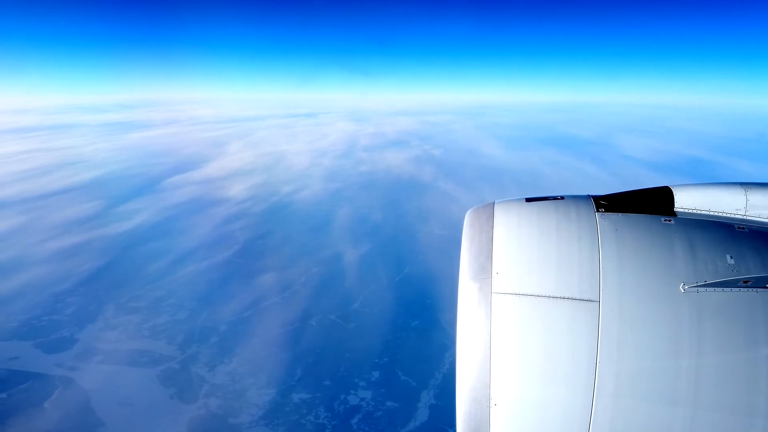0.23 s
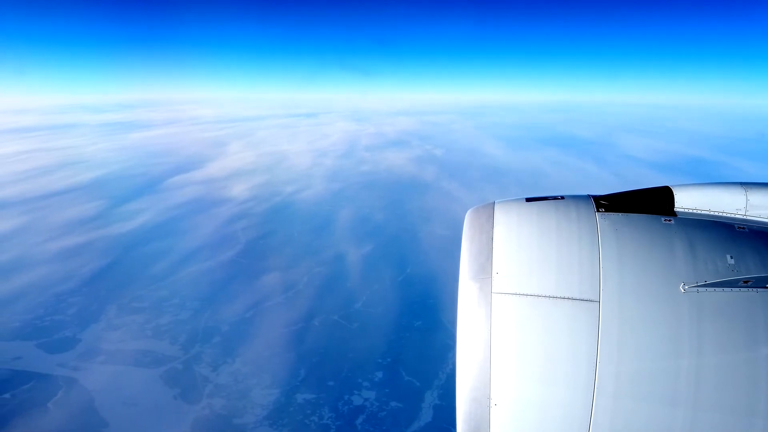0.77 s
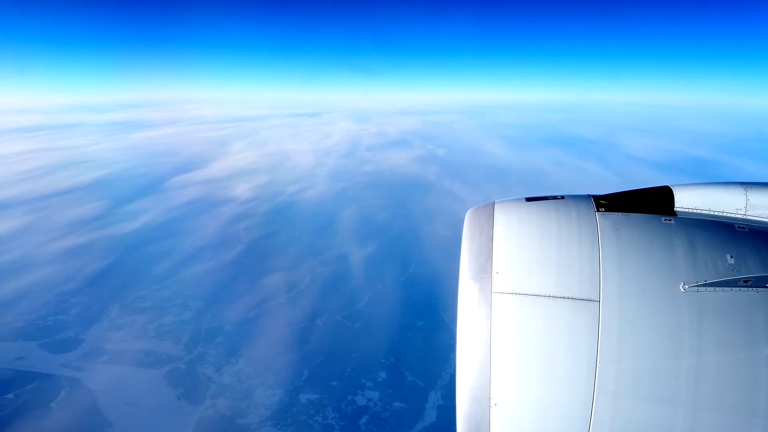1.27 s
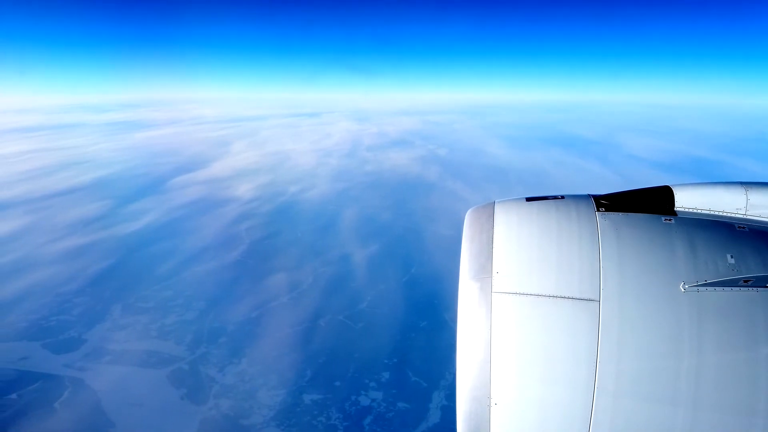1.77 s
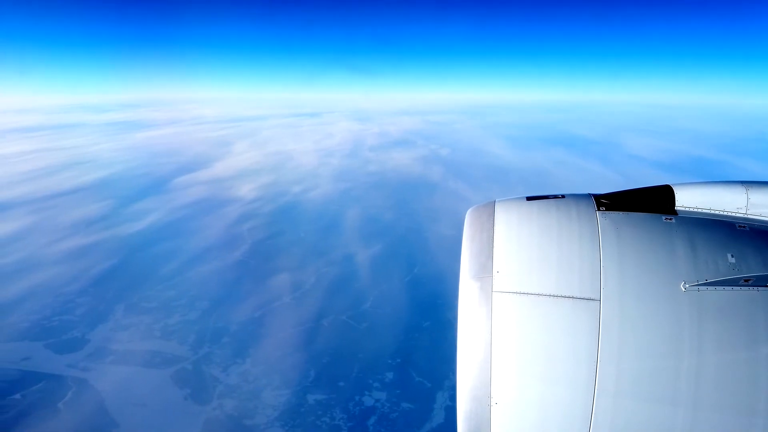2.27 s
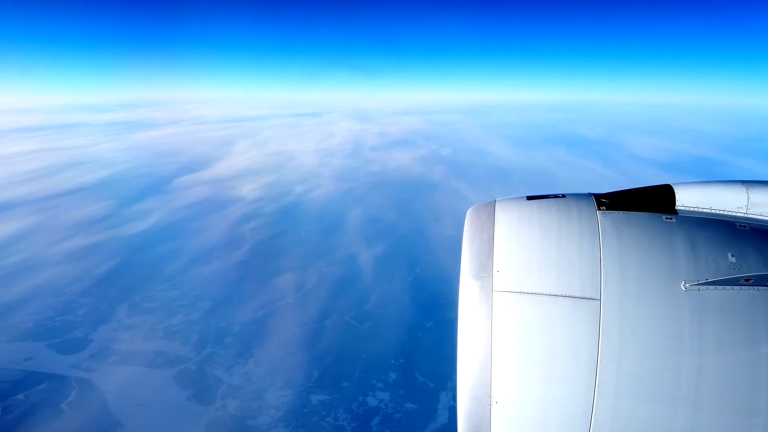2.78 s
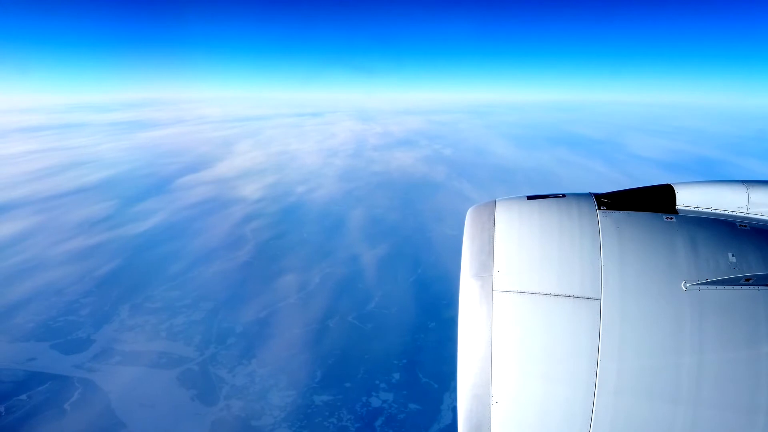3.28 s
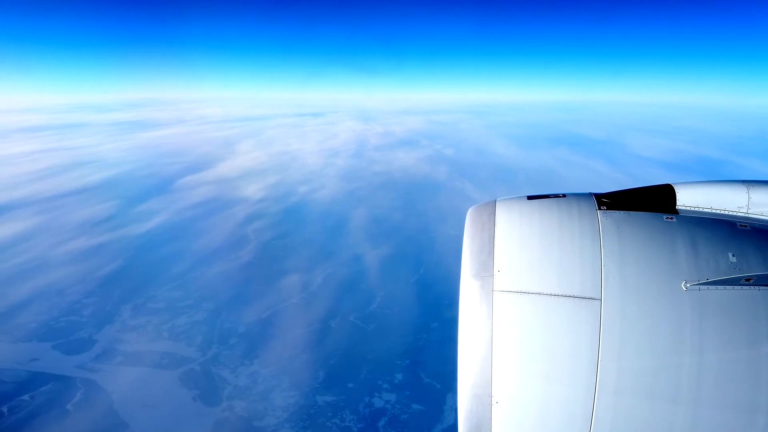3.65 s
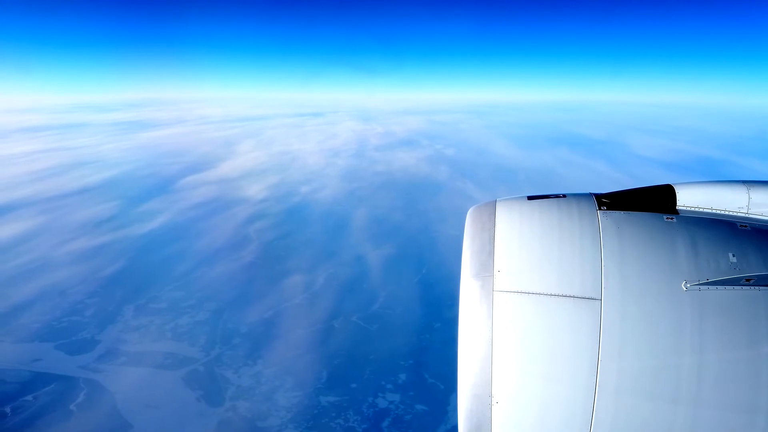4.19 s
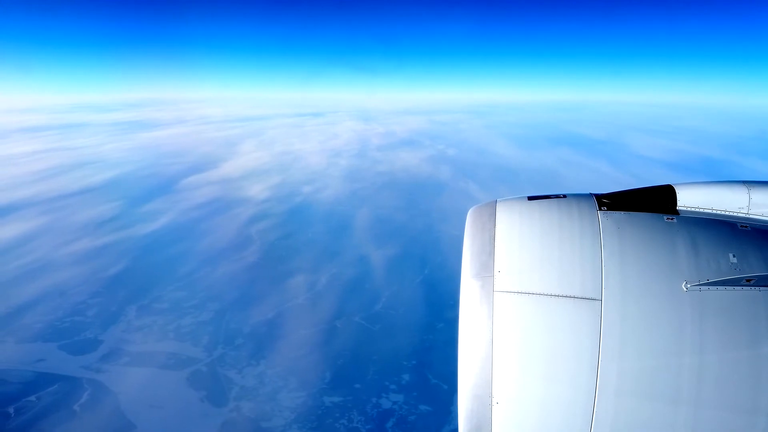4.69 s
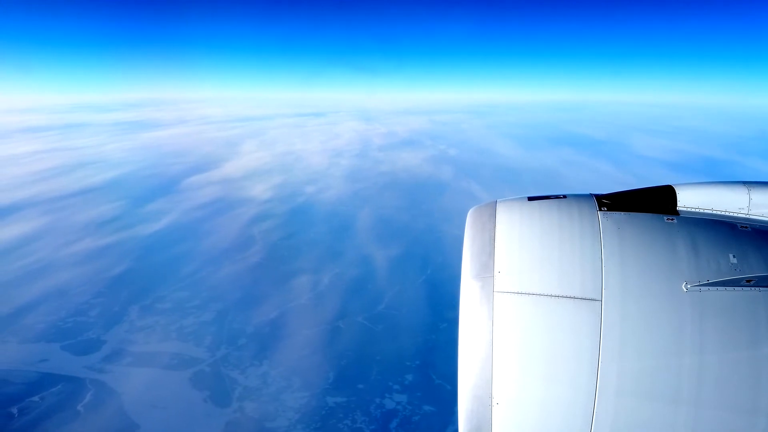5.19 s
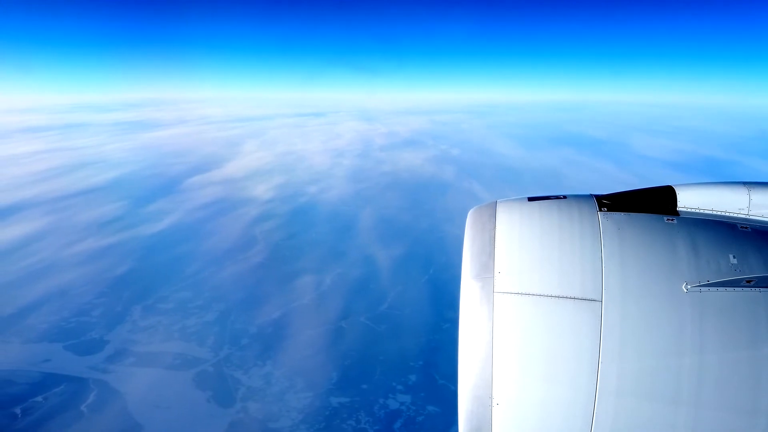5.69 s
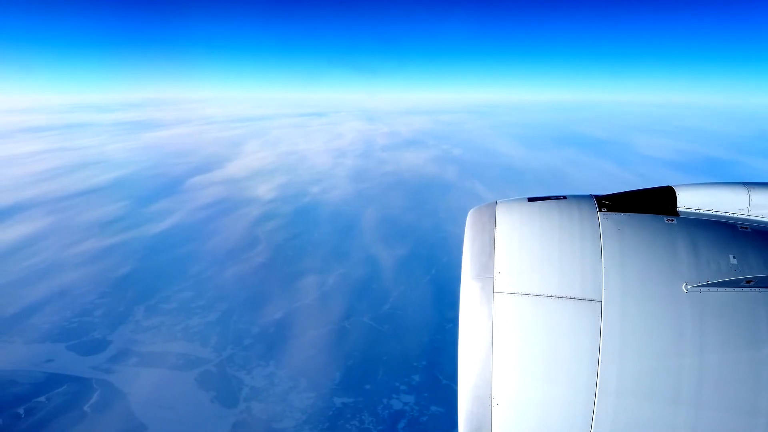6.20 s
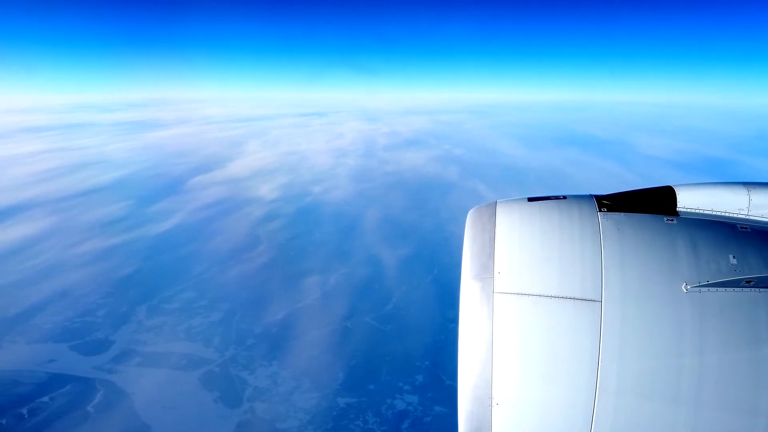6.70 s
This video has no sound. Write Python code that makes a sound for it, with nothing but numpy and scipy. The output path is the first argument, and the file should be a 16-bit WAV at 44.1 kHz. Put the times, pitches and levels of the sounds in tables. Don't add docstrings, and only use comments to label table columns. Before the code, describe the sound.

Inside a cruising airliner, low engine and airflow rumble surges unevenly under intermittent crisp plastic rustling and two faint, quick metal tinks.

```python
import sys
import numpy as np
from scipy import signal
from scipy.fft import rfft, irfft, next_fast_len
from scipy.io import wavfile
from scipy.ndimage import uniform_filter1d

SR = 44100
rng = np.random.default_rng(int(sys.argv[2]) if len(sys.argv) > 2 else 0)


def magnitude_from_level(level_db):
    exponent = np.asarray(level_db, float) / 20
    return 10 ** exponent


def master_out(mix):
    frames = np.transpose(np.atleast_2d(mix))
    ceiling = np.clip(frames, -1, 1)
    pcm = np.round(ceiling * 32767).astype(np.int16)
    wavfile.write(sys.argv[1], SR, pcm)


N = 306054


def evened(x):
    return x / np.sqrt(np.mean(x ** 2) + 1e-20)


def read(points, hz):
    f, value = np.transpose(points)
    return np.interp(np.log(hz + 1), np.log(f + 1), value)


def coloured(x, gain):
    size = next_fast_len(len(x))
    hz = np.fft.rfftfreq(size, 1 / SR)
    return irfft(rfft(x, size) * gain(hz), size)[:len(x)]


def resonance(f, hz, width, order=2):
    return 1 / (1 + (2 * (f - hz) / width) ** order)


def crackle(crease_db, ticks_per_s=5000, creases_per_s=1200, crease_ms=12, spread_db=-0.5):
    def draw(shape, chance):
        strength = magnitude_from_level(spread_db * np.minimum(rng.exponential(1, shape), 5))
        return strength * (rng.random(shape) < chance)

    ticks = draw(N, ticks_per_s / SR) * rng.choice([-1., 1.], N)
    frames, hop, size = N // 64 + 5, 64, 256
    bins = size // 2
    starts = draw((frames, bins + 1), creases_per_s * hop / SR / bins).T
    dying = signal.lfilter([1], [1, -np.exp(-1000 * hop / SR / crease_ms)], starts)
    turning = np.exp(2j * np.pi * hop / size * np.outer(np.arange(bins + 1), np.arange(frames)))
    creases = signal.istft(dying * turning, nperseg=size, noverlap=size - hop)[1][:N]
    return evened(ticks) + magnitude_from_level(crease_db) * evened(creases)


def gestures(rows, firm_body_db, fade_ms=6.8, lighter=1.3):
    firm_db = -40.5
    ms = np.arange(N) * 1000 / SR
    power = np.zeros((3, N))
    for s, db, fizz_db, rise, hold in rows:
        since = ms - 1000 * s
        attack = np.clip(since / max(rise, .3), 0, 1)
        decay = np.exp(-np.clip(since - rise - hold, 0, None) / fade_ms)
        body_db = firm_body_db + lighter * (db - firm_db)
        band_db = db + np.array([[body_db], [0], [fizz_db]])
        power += magnitude_from_level(2 * band_db) * (attack * decay) ** 2
    return power


# frequency in Hz, width in Hz, lift in dB.
RESONANT_LIFTS = [(3500, 600, 5), (4880, 350, 5), (7750, 400, 4), (9100, 400, 2), (10700, 700, 3),
                  (13100, 500, 2)]


def film(power, spectrum, ticks):
    def colour(f):
        lift = sum(db * resonance(f, hz, width) for hz, width, db in RESONANT_LIFTS)
        return magnitude_from_level(read(spectrum, f) + lift)

    def below(f, hz):
        return 1 / (1 + (f / hz) ** 12)

    shares = [lambda f: below(f, 2600) * (f > 1000),
              lambda f: below(f, 5400) - below(f, 2600),
              lambda f: 1 - below(f, 5400)]
    bands = [evened(coloured(ticks, lambda f: colour(f) * share(f))) for share in shares]
    return sum(np.sqrt(p) * band for p, band in zip(power, bands))


def uneven(x, patchy_db):
    z = signal.stft(x, nperseg=256)[2]
    patches = rng.standard_normal(z.shape[::-1]).T
    patches = uniform_filter1d(patches, size=6, axis=0)
    patches = evened(uniform_filter1d(patches, size=8, axis=1))
    varied = signal.istft(z * magnitude_from_level(patchy_db * patches), nperseg=256)[1][:N]
    return magnitude_from_level(-.12 * patchy_db ** 2) * varied


# start in seconds, level in dB, fizz in dB over the middle band, rise in ms, hold in ms.
SNAPS = [
    (1.9155, -36, 0, 0.24, 4.4),
    (2.490, -54, 6, 3.7, 4.6),
    (2.858, -44, 2, 7.6, 9.8),
    (2.886, -45, 3, 4.7, 12),
]
# start in seconds, level in dB, fizz in dB, rise in ms, hold in ms.
STROKES = [
    (2.598, -42, -5, 22, 40),
    (2.675, -51.5, -6, 9.1, 32),
    (3.625, -49.5, -8.5, 19, 16),
    (3.981, -47, -8.5, 12, 32),
    (4.062, -48.5, -13, 6, 29),
    (5.818, -41.5, -9, 22, 36),
    (3.3, -53, -9.5, 7.4, 30),
    (6.592, -51, 3, 10, 16),
    (6.04, -58, -1.5, 18, 24),
]
# start in seconds, level in dB, fizz in dB, rise in ms, hold in ms.
CRUMPLES = [(.098, -55, -4.5, 20, 65), (.17, -47, -8.5, 46, 15), (1.86, -63, -3, 25, 30),
            (2.43, -65, 0, 30, 30), (3.13, -50.5, -5.5, 29, 40), (3.21, -53.5, -12, 30, 80),
            (4.34, -66, -4.5, 30, 14), (4.41, -62.5, -3.5, 25, 11), (4.975, -65, -7, 15, 11),
            (5.08, -60, -9, 5.4, 73), (5.13, -54, -11, 86, 15), (5.785, -52, -8, 34, 5),
            (2.79, -64.5, -4, 20, 40), (2.838, -55, 0, 20, 5), (2.57, -61, -3, 25, 8),
            (2.70, -59, -4, 15, 45), (5.88, -54, -8, 20, 45), (6.025, -64, -2, 25, 10),
            (6.66, -60, -2, 20, 50), (1.96, -57, -4, 10, 35), (6.09, -63, -8, 5, 100),
            (6.24, -56.5, -6, 37, 18), (6.34, -60.5, -3.5, 12, 320), (6.53, -49, -2, 90, 12)]
# frequency in Hz, density in dB per Hz.
SNAP_FILM = [(1300, 2), (2300, -4.5), (4000, -7), (5300, -6), (5900, -9), (9000, -10), (10500, -8),
             (12000, -13.5), (13400, -11.5), (14300, -14), (15300, -13), (15800, -24.5)]
# frequency in Hz, density in dB per Hz.
FILM = [(1300, -8), (2300, -11.5), (3000, -4.5), (4300, -4), (5100, -9), (5500, -10), (7000, -14),
        (11000, -14.5), (11600, -21), (13600, -21.5), (15000, -29), (15800, -42)]


def wrapper():
    snap_power = gestures(SNAPS, firm_body_db=-1.5, lighter=0)
    snaps = film(snap_power, SNAP_FILM, crackle(crease_db=-20))
    worked = gestures(STROKES, firm_body_db=0.5) + gestures(CRUMPLES, firm_body_db=3.0, fade_ms=34)
    rustle = film(worked, FILM, crackle(crease_db=-5.5))
    return magnitude_from_level(-6.5) * snaps + uneven(magnitude_from_level(-7.0) * rustle, patchy_db=1.8)


def rubbed(rows, width_hz, taper, order, wider=0):
    out = np.zeros(N)
    rubs = rng.standard_normal((len(rows), 6000))
    for (s, hz, db, ms), rub in zip(rows, rubs):
        width = width_hz + wider * hz
        ring = evened(coloured(rub, lambda f: resonance(f, hz, width, order)))
        size, start = min(round(ms * SR / 1000), len(rub)), round(s * SR)
        out[start:start + size] += magnitude_from_level(db) * ring[:size] * signal.windows.tukey(size, taper)
    return out


# start in seconds, frequency in Hz, level in dB, length in ms.
POCKETS = [(0.19, 3750, -60, 54), (6.545, 5050, -66, 50), (6.545, 3500, -63, 45), (2.465, 2040, -50, 32),
           (2.49, 4800, -56, 19), (2.606, 3520, -47.5, 54), (2.6, 4950, -53, 50), (6.605, 7800, -62, 20),
           (2.86, 3270, -53, 30), (2.863, 4300, -53, 24), (2.887, 3480, -52, 24), (3.16, 3800, -64, 93),
           (3.19, 6000, -69, 23), (3.295, 6300, -66, 49), (3.302, 9000, -69, 25), (3.99, 3500, -61, 41),
           (5.145, 6060, -68, 50), (5.211, 4220, -60, 26), (5.215, 6170, -68, 25), (5.825, 3300, -55, 42),
           (6.05, 5200, -65, 25), (6.06, 6700, -68, 50), (6.29, 8000, -73.5, 60), (6.5, 8700, -72, 55),
           (6.52, 10300, -69, 90), (6.599, 5130, -61, 77), (6.601, 3560, -60, 60)]
# start in seconds, frequency in Hz, level in dB, length in ms.
FOLDS = [(0.11, 12500, -74, 85), (0.17, 6600, -69, 110), (0.19, 3700, -59, 66), (1.9150, 2700, -44.5, 20),
         (1.9155, 3800, -45, 16), (1.9155, 4730, -44, 26), (1.915, 12000, -46, 13), (2.6, 3300, -52, 30),
         (2.607, 4950, -58, 70), (2.66, 12800, -71, 55), (3.13, 6800, -70, 30), (3.13, 12500, -73, 30),
         (3.982, 4700, -59, 22), (5.15, 4600, -66, 110), (5.82, 1900, -47.5, 63), (5.82, 3000, -47, 22),
         (5.83, 8500, -62, 50), (5.835, 12000, -68, 60), (5.88, 9500, -71, 80), (6.045, 9800, -68, 40),
         (6.045, 6300, -67, 25), (6.045, 13500, -77, 30), (6.5, 5000, -68, 50), (5.82, 5500, -57, 60),
         (2.857, 2900, -54, 50), (3.99, 8500, -70, 78), (6.6, 5900, -61.5, 40), (5.87, 13500, -77.5, 70)]
# start in seconds, frequency
# in Hz, level in dB, length in ms.
SPECKS = [(0.113, 9700, -67, 35), (0.12, 7700, -68.5, 30), (0.19, 3700, -56, 12), (0.2, 5500, -62, 40),
          (0.218, 3500, -58, 8), (0.25, 7900, -70, 35), (0.26, 3310, -60, 30), (1.917, 2680, -45, 5.5),
          (1.92, 4200, -40, 6), (1.929, 4200, -44, 7.4), (1.924, 15000, -56, 12), (1.943, 4500, -48, 14),
          (1.965, 4400, -59, 35), (2.613, 10800, -59, 35), (2.626, 4900, -50, 14), (2.66, 3600, -47, 16),
          (2.66, 4900, -53, 14), (2.655, 10300, -60, 20), (2.685, 12800, -63, 12), (2.845, 10700, -64, 18),
          (2.859, 3300, -47, 8), (2.864, 12900, -54, 14), (2.864, 4500, -49, 9), (2.887, 15200, -56, 15),
          (2.892, 3600, -48, 7), (2.9, 3400, -49, 4.2), (2.905, 12900, -59, 25), (2.9, 10700, -62, 45),
          (5.8, 9500, -74, 28), (5.815, 5500, -60, 14), (5.838, 3600, -45, 16), (5.845, 1800, -44, 16),
          (5.86, 3500, -48, 10), (5.87, 4100, -57, 30), (5.875, 2600, -54, 44), (5.89, 6900, -66, 25),
          (5.9, 10200, -71, 60), (6.05, 5100, -68, 100), (6.5, 5000, -64, 20), (6.545, 5100, -63, 27),
          (6.545, 3500, -56, 10), (6.595, 10100, -59, 30), (6.605, 3700, -54, 18), (6.645, 5200, -63, 35),
          (6.68, 3600, -55, 10), (6.635, 10300, -65, 50), (3.995, 3720, -53, 12), (3.64, 4000, -56, 14),
          (4.03, 5000, -63, 30), (3.26, 8600, -70, 12),
          (1.93, 5100, -50, 30), (2.78, 7200, -75, 45), (2.8, 10800, -74, 35), (3.27, 6700, -69, 20),
                (3.985, 12600, -69, 15), (4.06, 9600, -68, 30), (4.065, 4600, -59, 19),
                (4.068, 6200, -64.5, 20), (5.83, 2500, -51, 41), (5.82, 5200, -55, 60),
                (5.88, 1900, -52, 50), (6.05, 6900, -66, 60), (3.16, 4900, -64, 40), (3.34, 3500, -62, 35)]


def pockets_and_folds():
    pockets = rubbed(POCKETS, width_hz=440, taper=.6, order=2)
    folds = rubbed(FOLDS, width_hz=600, taper=.3, order=4, wider=.2)
    creases = rubbed(SPECKS, width_hz=350, taper=.7, order=2, wider=.03)
    return pockets + folds + creases


# start in seconds, peak in dB.
TINKS = [
    (2.4673, -60),
    (2.8634, -46),
    (2.8690, -37),
    (2.8903, -37),
    (2.9507, -62),
    (3.3443, -64),
]
# frequency in Hz, level in dB, 60 dB decay time in seconds.
METAL_MODES = [(7750, 0, .06), (7850, -9, .04)]


def tinks():
    t = np.arange(8000) / SR
    touches = np.zeros(N)
    s, db = np.transpose(TINKS)
    touches[np.round(s * SR).astype(int)] = magnitude_from_level(db)
    ring = sum(magnitude_from_level(d - 60 * t / t60) * np.sin(2 * np.pi * hz * t) for hz, d, t60 in METAL_MODES)
    onset = np.minimum(t / .002, 1)
    return signal.oaconvolve(touches, magnitude_from_level(-1.0) * ring * onset)[:N]


def mode(hz, width):
    return evened(coloured(rng.standard_normal(N), lambda f: resonance(f, hz, width)))


# frequency in Hz, width in Hz, drone in dB, length of a surge in seconds.
DRONES = [
    (98.7, 26, -36.5, 0.056),
    (147, 30.5, -28.5, 0.07),
    (226.5, 27.3, -31.5, 0.061),
    (380, 93, -43, 0.048),
    (480.5, 16, -43.5, 0.069),
]
# time in seconds, level in dB.
RUMBLE = [(0.16, -24.1), (0.58, -23.5), (2.04, -29), (2.66, -30), (2.95, -27.5), (3.41, -22.5), (4.62, -24),
          (4.74, -28.3), (4.87, -27), (6.01, -30), (6.57, -34), (6.88, -28.5)]
# time in seconds, level in dB.
LOW_BOOM = [(0.34, -22.5), (0.553, -21), (0.613, -14.8), (0.711, -23.5), (0.81, -24), (1.41, -27),
            (1.78, -25), (1.89, -27.5), (2.44, -22.5), (3.1, -24), (3.32, -27), (3.47, -26), (3.85, -24.5),
            (4.18, -23.8), (4.49, -18.5), (4.68, -22), (5.02, -26), (5.14, -19), (5.9, -21), (6.02, -16.5),
            (6.25, -21.5), (6.55, -22.5), (6.89, -22.5)]
# time in seconds, level in dB.
HIGH_BOOM = [(0.15, -23.5), (0.24, -25.5), (0.64, -21.5), (0.82, -30), (0.92, -25.5), (1.3, -25),
             (2.44, -23.5), (2.88, -25), (3.16, -23), (3.37, -26), (3.54, -28.5), (4.58, -26),
             (4.97, -25.5), (5.56, -26.5), (5.66, -23.5), (5.8, -28), (6.2, -23.5), (6.35, -26.5),
             (6.53, -29), (6.83, -26.5)]
# time in seconds, level in dB.
LOW_HUM = [(0.06, -39.5), (0.42, -33), (2.71, -46), (4.15, -32.5), (4.49, -33), (4.67, -28), (4.8, -30.5),
           (5.39, -35), (5.79, -35.5), (6.31, -32.5)]
# time in seconds, level in dB.
HIGH_HUM = [(0.09, -43), (0.32, -46), (0.99, -39.5), (1.64, -37), (2.24, -35.5), (2.81, -41), (3.09, -31.5),
            (3.29, -38.5), (3.71, -35), (3.84, -33), (4.2, -32.5), (4.44, -35), (5.17, -30.5),
            (5.42, -36.5), (5.69, -35), (6.14, -35), (6.25, -31.5), (6.43, -35)]
# time in seconds, depth in dB.
LOW_CALM = [(0.93, 9), (1.13, 8), (2.83, 13), (3.21, 7), (3.62, 5), (3.95, 3.5), (4.28, 11), (5.41, 10)]
# time in seconds, depth in dB.
HIGH_CALM = [(0.4, 8.1), (1.57, 4), (1.96, 9.9), (2.72, 5.8), (3.27, 3.7), (3.67, 3.4), (3.98, 3.3),
             (4.45, 7.6), (6.0, 12)]
# time in seconds, depth in dB.
HUM_CALM = [(0.54, 4.6), (0.85, 7.1), (1.25, 4.1), (2.03, 6.9), (2.49, 3.4), (3.95, 2.7), (5.0, 6.6),
            (5.86, 6.5)]


def booms():
    t = np.arange(0, N + 64, 64) / SR
    out = np.zeros(N)

    def bells(s, length):
        return np.exp(-(2 * (t[:, None] - s) / length) ** 2)

    weather = [(RUMBLE, LOW_CALM), (LOW_BOOM, LOW_CALM), (HIGH_BOOM, HIGH_CALM),
               (LOW_HUM, HUM_CALM), (HIGH_HUM, HUM_CALM)]
    for (hz, width, drone_db, surge_s), (buffets, calms) in zip(DRONES, weather):
        ring = mode(hz, width)
        slow = uniform_filter1d(uniform_filter1d(ring ** 2, size=1800), size=1800)
        s, db = np.transpose(buffets)
        calm_s, depth_db = np.transpose(calms)
        drone = magnitude_from_level(2 * (drone_db - bells(calm_s, .14) @ depth_db))
        length = surge_s * magnitude_from_level(.5 * (db - drone_db - 8.5))
        surges = bells(s, length) @ magnitude_from_level(2 * db)
        level = np.interp(np.arange(N) / SR, t, np.sqrt(drone + surges))
        out += level * ring / np.sqrt(slow + 0.051)
    return out


# frequency in Hz, density in dB per Hz.
HULL = [(12, -41.5), (20, -20), (74, -6.5), (154, -2), (230, -5.5), (414, -13.5), (477, -12.5),
        (549, -17.5), (775, -20.5), (1010, -29.5), (2500, -44.5), (3250, -76), (5500, -120)]
# frequency in Hz, density in dB per Hz.
VENT = [(1800, -15.5), (2500, -2.5), (3400, 0.5), (4800, -3.5), (5600, -12), (7000, -14), (10000, -15.5),
        (13000, -18), (15000, -20.5)]
# frequency in Hz, width in Hz, level in dB.
PANELS = [(35.3, 9.9, -36), (59.6, 11, -42.5), (96, 55, -43.5), (269, 25, -46.5), (291.5, 45, -39),
          (762.5, 24, -50.5), (914.6, 24, -56.5), (1362, 27, -61.5)]


def hull(patchy_db=.8):
    frames, hz = N // 512 + 5, np.fft.rfftfreq(2048, 1 / SR)
    a, b, c, d, patches = rng.standard_normal((frames, 1025, 5)).T
    patches = uniform_filter1d(patches, size=20, axis=0)
    patches = evened(uniform_filter1d(patches, size=10, axis=1))

    def sound(z):
        drifting = signal.istft(z * magnitude_from_level(patchy_db * patches), nperseg=2048, noverlap=1536)[1]
        return evened(drifting[1024:N + 1024])

    roar_db = read(HULL, np.minimum(hz, 2300)) - 24 * np.log2(np.maximum(hz / 2300, 1))
    heard = hz < 15250
    roar = magnitude_from_level(roar_db) * heard
    hiss = magnitude_from_level(read(VENT, hz)) * (hz > 1200) * heard
    wall = magnitude_from_level(-26.5) * sound((a + 1j * b) * roar[:, None])
    air = magnitude_from_level(-64) * sound((c + 1j * d) * hiss[:, None])
    panels = sum(magnitude_from_level(db) * mode(f, width) for f, width, db in PANELS)
    return wall + air + panels


# frequency in Hz, 60 dB decay time in seconds.
CABIN = [(1500, 0.72), (4000, 0.3), (8000, 0.28), (15000, 0.19)]


def cabin():
    taps = np.zeros(SR // 2)
    at = np.arange(120, len(taps) - 10, 10)
    taps[at + rng.integers(0, 10, len(at))] = rng.choice([-1., 1.], len(at))
    hz, t, z = signal.stft(taps, SR, nperseg=128)
    decay = magnitude_from_level(-60 * t / read(CABIN, hz)[:, None])
    tail = signal.istft(z * decay, SR, nperseg=128)[1]
    return tail / np.linalg.norm(tail)


def scene():
    plastic, rubs, metal = wrapper(), pockets_and_folds(), tinks()
    roar = booms() + hull()
    sent = magnitude_from_level(-3.5) * plastic + magnitude_from_level(-9.5) * rubs + magnitude_from_level(-18.0) * metal
    echoes = signal.fftconvolve(sent, cabin())[:N]
    return (roar + plastic + rubs + metal + echoes)[None]


def roll_off(x):
    return signal.sosfilt(signal.butter(12, 15700, fs=SR, output="sos"), x)


def record(dry):
    faded = dry * signal.windows.tukey(N, 2 * .006 * SR / N)
    mix = np.array([coloured(faded[0], lambda f: f < 15700)])
    return roll_off(mix)


dry = scene()
out = record(dry)
master_out(out)
```